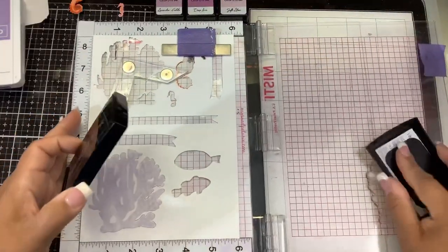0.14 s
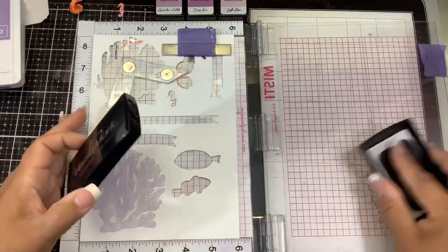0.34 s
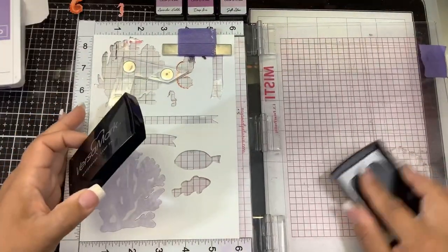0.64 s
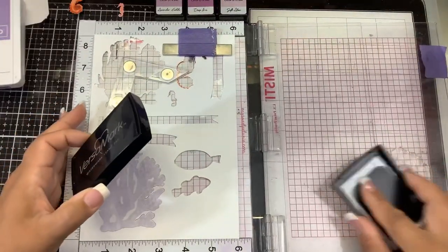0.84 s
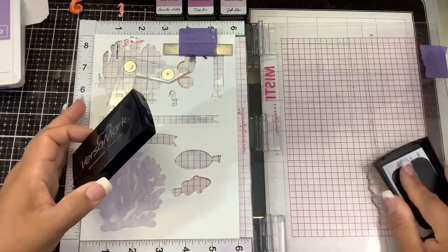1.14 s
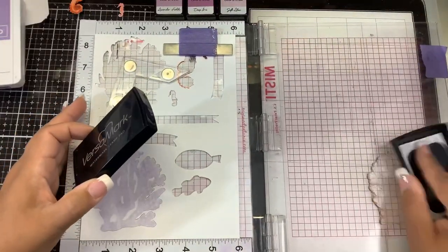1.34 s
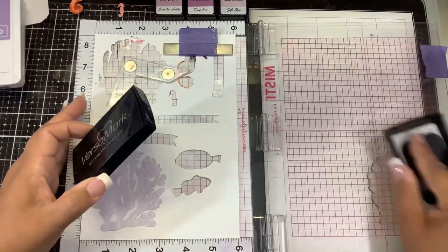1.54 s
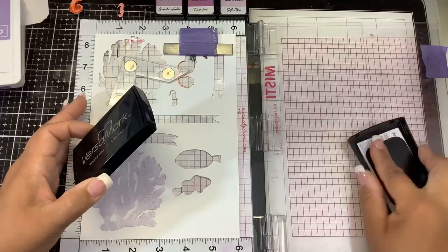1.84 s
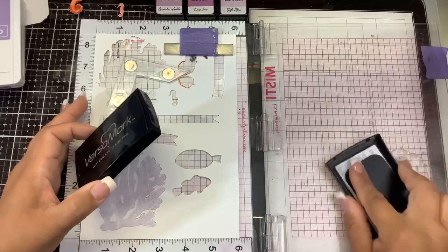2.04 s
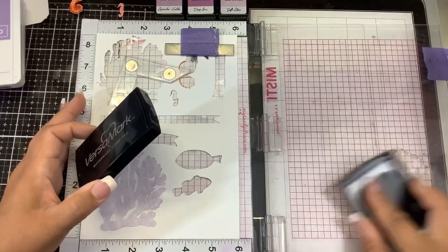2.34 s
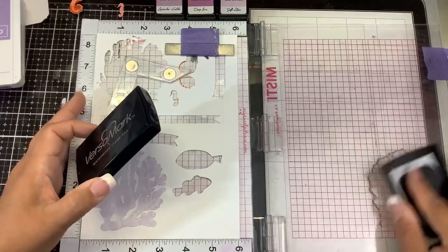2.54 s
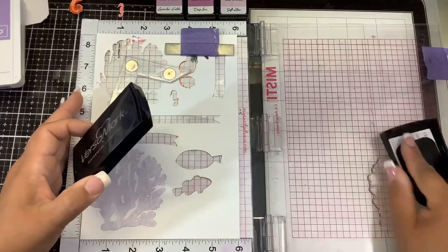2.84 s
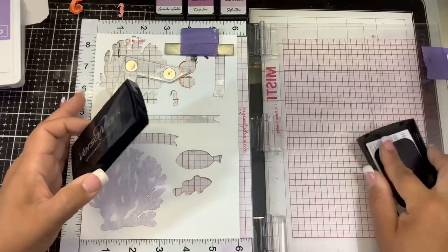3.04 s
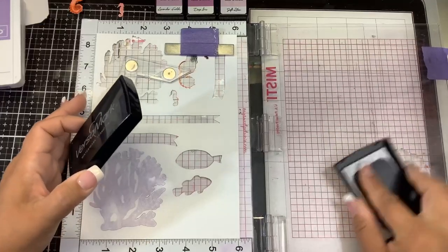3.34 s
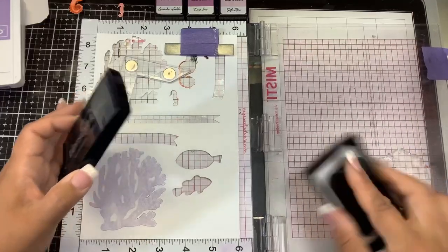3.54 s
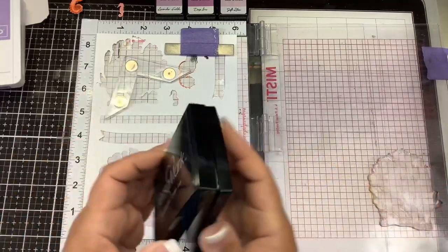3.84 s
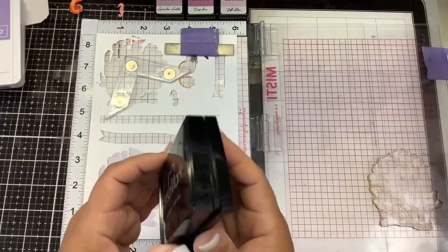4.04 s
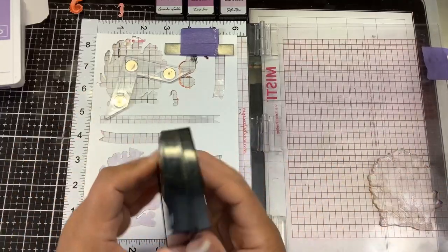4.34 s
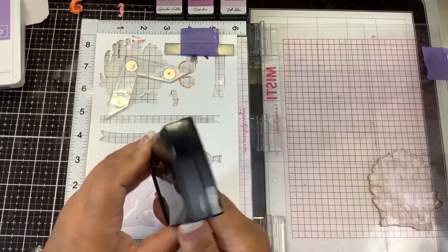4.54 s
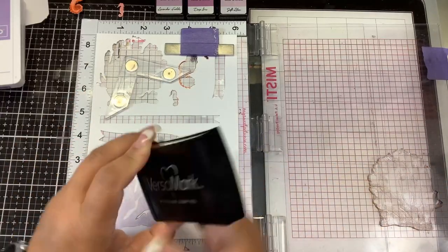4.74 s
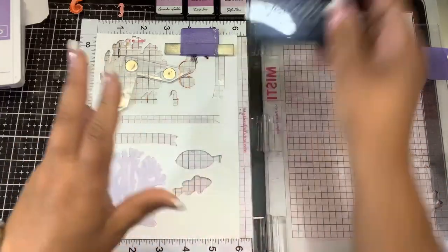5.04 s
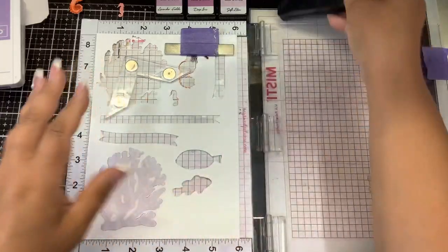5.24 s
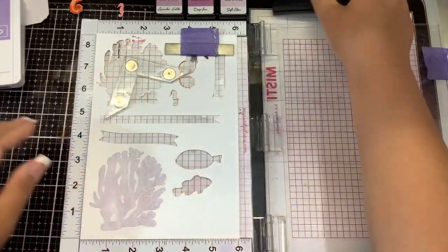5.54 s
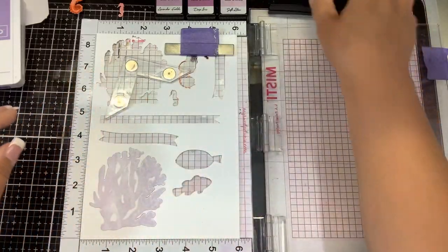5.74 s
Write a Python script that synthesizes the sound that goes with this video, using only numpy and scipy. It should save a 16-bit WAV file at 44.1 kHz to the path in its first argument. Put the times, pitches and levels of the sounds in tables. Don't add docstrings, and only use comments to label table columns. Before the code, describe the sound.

Quick, slightly uneven soft pats at about five a second, followed by sharp plastic clicks, finger rubbing and a hard knock on a tabletop.

```python
import sys
import numpy as np
from scipy import signal
from scipy.fft import rfft, irfft
from scipy.io import wavfile
from scipy.ndimage import uniform_filter1d

SR = 44100
rng = np.random.default_rng(int(sys.argv[2]) if len(sys.argv) > 2 else 0)


def gain_from_db(level_db):
    decades = np.asarray(level_db, float) / 20
    return 10 ** decades


def dump(signal):
    limited = np.clip(np.atleast_2d(signal).T, -1, 1)
    pcm = np.round(limited * 32767).astype(np.int16)
    wavfile.write(sys.argv[1], SR, pcm)


N = 260080
LENGTH = 9216
LEAD = .008


def evened(x):
    return x / np.sqrt(np.mean(x ** 2) + 1e-20)


def read(points, hz):
    point_hz, value = np.transpose(points)
    return np.interp(np.log(hz + 1), np.log(point_hz + 1), value)


def add(mix, start_s, sound):
    part = mix[max(round(start_s * SR), 0):][:len(sound)]
    part += sound[:len(part)]


def coloured(x, points):
    gain = gain_from_db(read(points, np.fft.rfftfreq(len(x), 1 / SR)))
    return irfft(rfft(x) * gain, len(x))


# pitch_hz, level_db [dB per Hz]
AIR = [(20, -10), (50, 0.5), (100, 4), (170, -12), (300, -6.5), (800, -17.5), (2000, -18), (4500, -22),
       (13700, -17.5), (15500, -20)]


def background():
    t = np.arange(N) / SR
    wander = uniform_filter1d(rng.standard_normal(N), size=4000)
    drift = evened(uniform_filter1d(wander, size=4000))
    beat_s, quietest_s, depth = .68, 4.27, .97
    beat = np.sqrt(1 - depth * np.cos(2 * np.pi * (t - quietest_s) / beat_s))
    hum_hz = 119.5 + 0.5 * drift
    hum = np.sqrt(2) * np.sin(2 * np.pi * np.cumsum(hum_hz) / SR)
    air = evened(coloured(rng.standard_normal(N), AIR))
    return gain_from_db(-62.5) * air + gain_from_db(-66.5) * beat * hum


# middle_s, length_s, hiss_db, dullness_db
STROKES = [(.03, 0.21, -52.5, -3), (3.47, 0.026, -66, -8), (3.515, 0.045, -35.5, -14),
           (3.935, 0.38, -57.5, -2.5), (4.216, 0.42, -67.5, 5.5), (4.406, 0.13, -48.5, -4),
           (4.505, 0.097, -52, -1), (4.669, 0.077, -42, -17), (4.68, 0.03, -36, -14),
           (4.746, 0.026, -44, -7), (4.796, 0.047, -29, -11), (4.85, 0.13, -47, -2.5),
           (5.042, 0.17, -51, -10), (5.173, 0.27, -51, -5), (5.303, 0.084, -46, -2.5),
           (5.352, .08, -37.5, -1.5), (5.478, 0.22, -47.5, -4), (5.665, 0.29, -51.5, -4),
           (5.821, 0.18, -59, -2.5)]
# pitch_hz, level_db [dB per Hz]
RUB = [(2500, -14.5), (3800, -5.5), (6000, -3.5), (11000, -7), (15500, -10.5)]
# pitch_hz, level_db [dB per Hz]
SCUFF = [(1100, -36), (1600, -11.5), (2000, -19), (2800, -12.5), (3600, -17), (4600, -23.5)]
# pitch_hz, level_db [dB per Hz]
BODY = [(250, -34.5), (400, -18.5), (1050, -8), (1400, -10.5), (2000, -29.5)]


def rubs():
    out = np.zeros(N)
    # 0.078 s later, 0.2 s long, hiss and dullness in dB
    peels = [(row[0] + 0.078, .2, -61.5, 4) for row in SLAPS]
    for middle_s, length_s, hiss_db, dull_db in STROKES + peels:
        u = np.linspace(-1, 1, round(length_s * SR))
        fade = signal.windows.tukey(len(u), .2)
        level_db = hiss_db - 10 * abs(u) - 12.0
        for extra_db, colour in ((0, RUB), (1.82 * dull_db - 1, SCUFF), (dull_db, BODY)):
            noise, slips = rng.standard_normal((len(u), 2)).T
            flicker = gain_from_db(3.5 * evened(uniform_filter1d(slips, size=200)))
            layer = gain_from_db(level_db + extra_db) * evened(coloured(noise, colour))
            add(out, middle_s - length_s / 2, layer * flicker * fade)
    return out


def packet(t, hz, db, arrival, swell, sharp):
    u = np.maximum(t - arrival, 0)
    shape = (u / swell * np.exp(1 - u / swell)) ** sharp
    return gain_from_db(db) * shape * np.sin(2 * np.pi * hz * u)


def ring(modes, t, tuning=1):
    return sum((-1) ** k * gain_from_db(db - 60 * t / t60) * np.sin(2 * np.pi * hz * tuning * t)
               for k, (hz, db, t60) in enumerate(modes))


# start_s, boom_db, lowest_mode_db, upper_modes_db, sway_db
BLOWS = [(0.083, -27, 1, 2, -26.5), (.3773, -21.5, -6, 5, -27.5), (0.5376, -42.5, -7, 16.5, -64),
         (0.635, -28.5, -6, -3, -30), (0.8672, -15.5, -2.5, 6.5, -23), (1.0826, -18, 5, 2, -23),
         (1.3216, -18.5, 1, 6, -26), (1.5498, -16, -1.5, 4, -27), (1.7545, -19.5, 6.5, 8.5, -24.5),
         (1.881, -56, 5, 23, -53), (1.9704, -18.5, -1, 3.5, -26), (2.1865, -24, -3, 6, -25.5),
         (2.3916, -20, 0, 6, -24.5), (2.5953, -18, -4.5, -14, -28.5), (2.7964, -18, -1, 2, -29),
         (2.9785, -21, 2.5, 4.5, -27.5), (3.158, -23.5, -1, 4, -29.5), (3.328, -24.5, -4, 3, -29)]
# start_s, boom_db, lowest_mode_db, upper_modes_db, sway_db
LANDINGS = [
    (5.173, -29.5, 0, 2, -51),
    (5.538, -49, 0, 0, -61.5),
    (5.2217, -25, 0.0071, 4.5, -54),
    (5.345, -51.5, 0, 2, -71.5),
    (5.578, -12, 0, 4, -35),
]
# pitch_hz, level_db, arrival_s, swell_s
TABLE = [(136.5, -1.5, 0.0087, 0.018), (182.4, 6.5, 0.0054, 0.012), (275.6, -18, 0.002, 0.017),
         (357.8, -19, 0.00476, 0.0098), (536, -22, 0.00497, 0.0095), (700, -23, 0.00359, 0.0079),
         (1020, -30, 0.00263, 0.0034)]
# pitch_hz, level_db, arrival_s, swell_s
FAR_EDGE = [(134.8, -6, 0.0012, 0.019), (190.5, 10, 0.0041, 0.011), (252, -10.5, 0.0036, 0.017),
            (332, -19, 0.0022, 0.016), (825, -14.5, 0.0014, 0.0045), (473, -22, 0.0016, 0.011)]
# pitch_hz, level_db, arrival_s, swell_s
FRAME = [(47.8, -8.5, 0.0029, 0.04), (100.7, -9, 0, 0.024)]
# pitch_hz, level_db, t60_s
AFTER = [(133, -2, .16), (186, 0, .13), (265, -12, .1)]
# pitch_hz, level_db, t60_s
ROCKING = [(38.85, -6.5, 0.4), (56.4, -10, 0.63)]


def table():
    out, t = np.zeros(N), np.arange(SR // 2) / SR
    sway = sum(packet(t, *mode, sharp=5.5) for mode in FRAME)
    sway = sway + ring(ROCKING, t) * (1 - np.exp(-t / 0.087)) ** 4
    after = ring(AFTER, t) * (1 - np.exp(-t / 0.055)) ** 2
    for rows, top, sharp, after_db in ((BLOWS, TABLE, 2.27, -8.5), (LANDINGS, FAR_EDGE, 1.4, -11)):
        for start_s, boom_db, low_db, upper_db, sway_db in rows:
            tilt_db = [low_db, 0] + [upper_db] * len(top)
            boom = sum(packet(t, hz, db + extra_db, *times, sharp=sharp)
                       for (hz, db, *times), extra_db in zip(top, tilt_db))
            top_sound = gain_from_db(boom_db - 7.5) * (boom + gain_from_db(after_db) * after)
            add(out, start_s, top_sound + gain_from_db(sway_db) * sway)
    return out


# pitch_hz, level_db, t60_s
MURMUR = [(280, -1, .04), (360, -2, .035), (500, -4, .03), (640, -4, 0.021)]


def tremble():
    t, out = np.arange(SR) / SR, np.zeros(N)
    blows = BLOWS + LANDINGS
    boom_db, sway_db = np.transpose(blows)[[1, 4]]
    share = 0.46
    # modes, level at rest in dB, time of the peak in s, level after each blow in dB
    parts = ((MURMUR, -90, 0.082, -58.5 + share * (sway_db + 26.5)),
             (AFTER, -73.5, 0.057, -44 + share * (boom_db + 19)),
             (ROCKING, -74, 0.085, -51.5 + sway_db + 31.5))
    for modes, still_db, peak_s, levels_db in parts:
        level = np.full(N, gain_from_db(still_db))
        swell = (t / peak_s * np.exp(1 - t / peak_s)) ** 2
        for row, db in zip(blows, levels_db):
            add(level, row[0], gain_from_db(db) * swell)
        shaken = signal.oaconvolve(rng.standard_normal(N), ring(modes, t[:SR // 2]))[:N]
        out += gain_from_db(-6.0) * level * evened(shaken)
    return out


# start_s, level_db, low_mode_hz, high_mode_hz
PLATE = [(0.085, -38, 670, 1970), (0.379, -26.5, 541, 1730), (0.637, -37.5, 736, 1730),
         (0.869, -19, 711, 1468), (1.088, -26.5, 711, 2460), (1.325, -30, 507, 1380),
         (1.554, -25.5, 526, 1415), (1.758, -20.5, 536, 1700), (1.974, -21.5, 616, 1350),
         (2.189, -24, 688, 1700), (2.396, -29, 950, 1760), (2.599, -31, 740, 1730), (2.8, -31, 559, 1780),
         (2.983, -23.5, 536, 1730), (3.159, -29, 536, 1730), (3.332, -31, 700, 2420)]
# start_s, level_db, pitch_hz, swell_s
POPS = [(.128, -54, 1970, .0025), (.149, -52, 1850, .0025), (.167, -56, 1020, 0.0046),
        (.258, -49, 1410, .003), (0.258, -55, 2500, 0.0032), (.281, -52, 1010, .005),
        (.285, -56, 1400, 0.0037), (.43, -56, 2000, .003), (.483, -59, 1900, 0.0025),
        (.54, -43.5, 1223, 0.0036), (.545, -43, 700, 0.005), (.653, -49, 700, .005),
        (.982, -59, 1850, .004), (1.027, -58, 1900, .004), (1.885, -52, 1100, .004),
        (1.89, -53, 700, 0.0041), (3.349, -37, 900, 0.003), (3.464, -53, 1810, .003),
        (3.478, -57, 810, .004), (3.495, -46.5, 1750, 0.0039), (3.508, -43, 1756, 0.0032),
        (3.515, -48, 1800, 0.0026), (3.985, -40.5, 1980, 0.0081), (4.212, -55, 840, 0.0035),
        (4.431, -49, 1050, 0.0022), (4.431, -55, 3000, .0015), (4.674, -52, 2235, 0.0047),
        (4.686, -50, 1010, 0.0023), (4.711, -52, 1050, 0.0018), (4.75, -55, 1040, 0.0032),
        (4.776, -46, 2200, 0.0027), (4.776, -51, 1050, 0.0034), (4.853, -55.5, 1026, 0.0082),
        (4.862, -58, 720, 0.0059), (5.222, -17.5, 1116, 0.0023), (5.283, -30, 1100, 0.003),
        (5.293, -37, 2300, 0.004), (5.306, -42, 3400, .003), (5.318, -41, 2510, .003),
        (5.33, -44, 3290, .003), (5.579, -21, 854, 0.0028), (5.599, -34, 1200, 0.0039),
        (5.61, -37, 845, 0.0065), (2.078, -53, 690, 0.0042), (2.203, -38.5, 1003, .005),
        (2.986, -38, 518, .006), (5.6, -36, 420, .008), (5.62, -47, 330, .009)]
# pitch_ratio, level_db, arrival_s
NEIGHBOURS = [(1, 0, 0), (.84, -5, .0015), (1.19, -5, .0007)]


def plate():
    out, t = np.zeros(N), np.arange(3000) / SR
    for start_s, level_db, low_hz, high_hz in PLATE:
        low = packet(t, low_hz, db=-14.5, arrival=0.00406, swell=0.0053, sharp=0.79)
        high = packet(t, high_hz, db=-10.5, arrival=0.001185, swell=0.0026, sharp=0.83)
        add(out, start_s, gain_from_db(level_db) * (low + high))
    for start_s, level_db, hz, swell_s in POPS:
        for ratio, extra_db, late_s in NEIGHBOURS:
            add(out, start_s, packet(t, hz * ratio, level_db + extra_db - 3.0, late_s, swell_s, sharp=1.6))
    return out


def causal(x, points):
    log_gain = read(points, np.fft.rfftfreq(len(x), 1 / SR)) * np.log(10) / 20
    circle = np.concatenate([log_gain, log_gain[-2:0:-1]])
    response = np.exp(np.conj(signal.hilbert(circle))[:len(log_gain)])
    return irfft(rfft(x) * response, len(x))


# pitch_hz, t60_s
ROOM = [(300, 0.21), (1000, 0.1), (3000, 0.11), (8000, 0.1), (15000, 0.086)]


def scatter():
    hz, t, bands = signal.stft(rng.standard_normal(LENGTH), SR, nperseg=128)
    fading = bands * gain_from_db(-60 * t / read(ROOM, hz)[:, None])
    tail = signal.istft(fading, SR, nperseg=128)[1][:LENGTH]
    tail = np.roll(tail, round(LEAD * SR))
    rise = np.clip((np.arange(LENGTH) / SR - LEAD) / 0.00056, 0, 1)
    return tail * rise


def lowpassed(x, hz):
    return signal.sosfilt(signal.butter(2, hz, fs=SR, output="sos"), x)


def contact(row, lead_db, grit_db, tail_db):
    start_s, level_db, body_db, knock_db, edge_db, decay_s = row
    t = np.arange(LENGTH) / SR - LEAD
    before, after, age = t < 0, t > 0, abs(t)
    uneven = gain_from_db(grit_db * rng.standard_normal(LENGTH))
    grit = evened(rng.standard_normal(LENGTH) * uneven)
    crack = grit * after * np.exp(-age / decay_s)
    touch = (lowpassed(grit, 2600) + 0.22 * grit) * gain_from_db(lead_db) * np.exp(-age / 0.0042)
    touch = touch * before * (t > .0005 - LEAD)
    linger = gain_from_db(-1) * lowpassed(grit[::-1], 1300) * after
    linger = linger * (1 - np.exp(-age / 0.0025)) * np.exp(-age / (2.39 * decay_s))
    colour = [(150, body_db - 5.0), (450, body_db + 7.5), (1000, body_db + 7.0),
              (1500, knock_db + 6.5), (2600, knock_db + 6.5), (3500, 0.013), (6500, 0.031),
              (9000, edge_db - 0.5), (13500, edge_db + 2.0), (16000, edge_db - 8.5)]
    return causal(crack + touch + linger + gain_from_db(tail_db) * scatter(), colour)


def weighted(row, knock_db):
    start_s, level_db, weight_db, edge_db, decay_s = row
    return start_s, level_db, weight_db, knock_db + 0.55 * weight_db, edge_db, decay_s


def spread(x, lag):
    hz = np.fft.rfftfreq(len(x), 1 / SR)
    turns = 2 * lag * np.sqrt(500 * hz) - lag * np.sqrt(500 / 9000) * hz
    return irfft(rfft(x) * np.exp(-2j * np.pi * turns), len(x))


def peaked(x, db):
    band = signal.sosfilt(signal.butter(2, (3000, 7000), "band", fs=SR, output="sos"), x)
    return gain_from_db(db) * x / np.sqrt(uniform_filter1d(band ** 2, size=130).max())


# start_s, peak_db, weight_db, edge_db [above 7 kHz], decay_s
SLAPS = [(0.086, -46.5, -4, -3.5, 0.0012), (0.3789, -34.5, -5, -4, 0.0062), (0.6375, -49, 1, -4, 0.0089),
         (0.8686, -30, -5, -3.5, 0.0074), (1.0859, -33, -5, -2, 0.005), (1.3245, -36, -3.5, -4, 0.0071),
         (1.5522, -32, -3.5, -1, 0.0045), (1.758, -27.5, -5, 0, 0.0047), (1.9740, -31, 1.5, -6, 0.0064),
         (2.1886, -34, -4, -5, 0.0062), (2.394, -36, -2.5, -5.5, 0.0066), (2.601, -42, -1.5, -2.5, 0.0084),
         (2.7998, -36, -4, 1, 0.0049), (2.981, -31, -3.5, -3.5, 0.0044), (3.1601, -35.5, -8, -6, 0.0078),
         (3.3341, -39, -2, -5.5, 0.0097)]
TOUCH_DB = [-0.5, -6, -1, -7, -1, -0.5, -6.5, -5.5, -40, -10, -3, 1, -3, -8, -4, -15]
# pitch_hz, width_hz, level_db
PAD = [(1500, 320, -4.5), (5760, 570, -36), (8560, 12000, -11), (14600, 570, 29.5), (12800, 620, 22.5)]


def slaps():
    out, t = np.zeros(N), np.arange(400) / SR
    for row, touch_db in zip(SLAPS, TOUCH_DB):
        start_s, peak_db, weight_db, edge_db, decay_s = row
        burst = contact(weighted(row, knock_db=0.2), lead_db=touch_db, grit_db=2.5, tail_db=-9.0)
        modes = [(hz, db + edge_db * (hz > 12000), 5 / (width + 400)) for hz, width, db in PAD]
        blunt = ring(modes, t, tuning=rng.uniform(.96, 1.03))
        rung = evened(np.convolve(burst, blunt)[:LENGTH])
        slap = spread(evened(burst) + gain_from_db(-8.0) * rung, lag=0.00396)
        add(out, start_s - LEAD, peaked(slap, peak_db - 2.5))
    return out


# start_s, peak_db, weight_db, knock_db [near 2 kHz]
TICKS = [(.0996, -43, -1, -4.5), (.1281, -47.5, -33, -3.5), (.2565, -44, -8.5, -1.5), (.282, -62, 11, 6),
         (.4818, -60, 4, 7), (.5385, -52, 15, 8.5), (.6547, -47, -11, -3), (.7426, -60, 4, 8),
         (.978, -58, -4, -2), (1.0255, -62, -8, 2), (1.1662, -56, -5, -7), (1.2135, -59, 5, 1),
         (1.43, -62, 2, 4), (1.485, -62, -13, 8), (1.718, -37, -15.5, -4), (1.8357, -58.5, 3, 2),
         (1.8834, -60.5, 17.5, 9), (2.073, -50.5, -3.5, -1), (2.1515, -42.5, -17, -12),
         (2.2362, -54, 2, 4.5), (2.4426, -55, -3, 6), (2.5716, -40.5, -9, 3), (2.6901, -47.5, -9, -4),
         (2.8519, -39, -12.5, -7), (3.0415, -55, -11, 5), (3.0909, -57.5, -2, -15), (3.3844, -61, -12, 0),
         (1.19, -62, -2, 6), (1.63, -72, -3, -2), (1.672, -61.5, -8, 6), (1.808, -60, -15, 7),
         (2.032, -57.5, -6, -5), (2.268, -67, -7, 4)]
# start_s, peak_db, weight_db, knock_db [near 2 kHz]
NAILS = [(3.4638, -47, -9, 1), (3.4756, -47.5, -10, -12), (3.4954, -45, -35, -3), (3.5084, -42, -32, -2),
         (4.1155, -42, -4.5, 0), (4.2096, -59, -6, -7), (4.238, -60.5, -9, -10), (4.335, -55, -1.5, -9),
         (4.4088, -53.5, -20, 0), (4.4308, -52, -10, -1), (4.4887, -62, 12, 0), (4.6852, -41, -12, -15),
         (4.7097, -42.5, -19, -22), (4.7491, -52, -21, -5), (4.7535, -47.5, -25, -16),
         (4.98, -52.5, -10, -6), (5.4214, -50.5, -10, -4), (5.469, -54.5, -2, -3)]


def ticks():
    out = np.zeros(N)
    edge_db = -2
    for rows, decay_s, lag_s, tail_db in ((TICKS, 0.0037, .006, -11.5), (NAILS, 0.00088, .002, -18)):
        for row in rows:
            burst = contact((*row, edge_db, decay_s), lead_db=-15.0, grit_db=6.5, tail_db=tail_db)
            add(out, row[0] - LEAD, peaked(spread(burst, lag=lag_s), row[1] - 3.5))
    return out


# start_s, peak_db, weight_db, edge_db [above 7 kHz], decay_s
CLICKS = [
    (3.7602, -19.5, -16, -10.5, 0.0026),
]
BOUNCES = [
    (3.7846, -28.5, -27, -7.5, 0.003),
]
SNAPS = [
    (3.8384, -14.5, -25, -9, 0.0031),
    (3.8832, -53, -11, 3.5, .004),
]
FLICKS = [
    (4.7976, -23.5, -17.5, 0.5, 0.0017),
]
SHUTS = [
    (3.9700, -44, -5, -5, 0.0024),
    (3.9749, -19.5, -15.5, -4, 0.0024),
]
KNOCKS = [
    (5.166, -29, -3, -4.5, 0.005),
    (5.2215, -22.5, -2.5, -7, 0.004),
]
ROCKS = [(5.2798, -36.5, 0, 3.5, 0.0037), (5.2885, -37.5, -5, -6, .003), (5.3628, -43, -7, -5, 0.0024),
         (5.5602, -42.5, -15, -7, 0.0015), (5.5656, -45, -18.5, -2, 0.0038)]
RATTLES = [(5.285, -26, -35, 2, 0.0024), (5.2915, -35, -10, -10, .003), (5.3015, -36, -12, -16, 0.0022),
           (5.3122, -35, -12, -12, 0.003), (5.3232, -34, -16, -8, 0.005), (5.3325, -42, -12, -12, 0.0032),
           (5.3413, -38.5, -15, 5, 0.003), (5.5371, -32, -36, -5, 0.002)]
THUDS = [
    (5.5768, -24, -12.5, -1.5, .002),
    (5.5788, -12.5, -7.5, -3, 0.0013),
]
# pitch_hz, level_db, t60_s
CASE = [(513, -16, 0.04), (845, -8.5, .05), (1384, -4.5, .05), (1660, -4.5, 0.047), (2143, -8.5, 0.07),
        (2880, -12.5, .025), (3795, -7, 0.066), (4753, -7, .045), (5103, -14, .05), (5660, 0, .022),
        (6030, 0.5, 0.035), (6874, -15.5, .03), (7833, -13, .04), (8791, -13, 0.05)]
GLANCED = [(1390, -8, .03), (2160, -2, .05), (3050, -0.5, .015), (3800, -6, .04), (4080, -1, .04),
           (4800, -7.5, .03), (5500, -4, .02), (6150, -3, .025), (7350, -4, .03)]
HALF_SHUT = [(3898, -1.5, 0.024), (1368, -15, 0.035), (1690, -15.5, 0.044), (2160, -12, 0.039),
             (3110, -11.5, .03), (3690, -4.5, 0.049), (5040, -3, 0.03), (6010, -0.5, 0.03), (6150, -2, .03),
             (7900, -21, 0.028), (8550, -19, .04)]
GRIPPED = [(700, -9.5, 0.028), (1050, -8, .02), (2126, -12, .025), (3620, -7, .025), (4800, -2, 0.023),
           (5066, 2.5, .025), (5820, 4, 0.025), (6800, -9, .025), (8400, -10, 0.023), (9780, -3, .025),
           (10570, -3, .025), (11300, -6, 0.018)]
CLOSED = [(807, -9, 0.026), (1346, 1.5, .036), (1680, -7, 0.037), (1890, -6.5, 0.045), (2590, -9, 0.042),
          (3410, -14, 0.035), (3860, -5, 0.033), (5028, -7, .035), (5540, -2, .015), (6200, -12, 0.05),
          (8100, -21, 0.035)]
RESTING = [(521, -14, 0.093), (719, -2.5, 0.06), (1100, -1, 0.023), (1440, -3, 0.043), (1900, 2.5, 0.029),
           (2440, -20, 0.037), (3090, -11, .075), (3810, -10, 0.025)]
RIM = [(765, -4, 0.024), (1100, 0.5, 0.026), (1290, -2, .035), (1700, -11.5, .025)]
LID = [(2200, -3, .012), (2600, -1, 0.012), (3000, 0, 0.012), (3400, -3, 0.014), (5820, -4, .009)]
PRESSED = [(711, -3.5, 0.067), (840, 0.5, 0.036), (1123, -4.5, .04), (1368, -6, 0.046), (2030, -8.5, .04),
           (2645, 0, 0.03), (2990, -0.5, 0.02), (4420, -13.5, .04), (5350, -11, 0.045), (6660, -2.5, 0.018),
           (9270, -4.5, .015)]


def clicks():
    out, t = np.zeros(N), np.arange(3000) / SR
    # contacts, what rings, level of the ring and of the reflections in dB
    kinds = ((CLICKS, CASE, -.6, -13), (BOUNCES, GLANCED, -.7, -13), (SNAPS, HALF_SHUT, -.6, -15),
             (SHUTS, CLOSED, -3.1, -15), (FLICKS, GRIPPED, -3.1, -16), (KNOCKS, RESTING, -3.1, -14),
             (ROCKS, RIM, 3.1, -14), (RATTLES, LID, 2.1, -17), (THUDS, PRESSED, -3.1, -14))
    for rows, modes, ring_db, tail_db in kinds:
        for row in rows:
            hit = weighted(row, knock_db=3.5)
            sound = evened(contact(hit, lead_db=-48, grit_db=-0.5, tail_db=tail_db))
            rung = ring(modes, t, tuning=rng.uniform(.99, 1.01)) * (1 - np.exp(-t / .0006))
            if modes is LID:
                shaking = sound[round(LEAD * SR):][:len(t)]
                rung = signal.oaconvolve(shaking, rung)[:len(t)]
            add(sound, LEAD, gain_from_db(ring_db) * evened(rung) * np.sqrt(LENGTH / len(t)))
            add(out, row[0] - LEAD, peaked(sound, row[1] - 2.5))
    return out


# start_s, pitch_hz, width_hz, level_db, fall_db [per s]
WHIRS = [
    (4.745, 1080, 150, -56.5, 196),
    (4.82, 1050, 150, -58.5, 148),
    (5.28, 2800, 1100, -42, 200),
    (5.45, 1945, 120, -61, 249.5),
    (5.63, 1950, 90, -62, 120),
    (5.7, 1930, 90, -63, 200),
    (5.77, 1950, 90, -67, 120),
    (5.86, 1950, 90, -65.5, 100),
]


def whir():
    t, out = np.arange(0, .4, 1 / SR), np.zeros(N)
    for start_s, hz, width_hz, level_db, fall_db in WHIRS:
        resonance = ring([(hz, 0, 3.6 / width_hz)], t[:2000])
        rung = signal.oaconvolve(rng.standard_normal(len(t)), resonance)[:len(t)]
        rise = np.minimum(t * fall_db / 2, 1)
        add(out, start_s, rise * gain_from_db(level_db - fall_db * t) * evened(rung))
    return out


def scene():
    surroundings = background() + rubs()
    answers = table() + tremble() + plate()
    contacts = slaps() + ticks() + clicks() + whir()
    return (surroundings + answers + contacts)[None]


def roll_off(x):
    return signal.sosfilt(signal.butter(12, 16820, fs=SR, output="sos"), x)


def record(dry):
    squeezed = np.tanh(dry / .95) * .95
    edge = signal.firwin(255, 16100, window=("kaiser", 9), fs=SR)
    mix = signal.oaconvolve(squeezed, edge[None], "same")
    return roll_off(mix)


dry = scene()
out = record(dry)
dump(out)
```